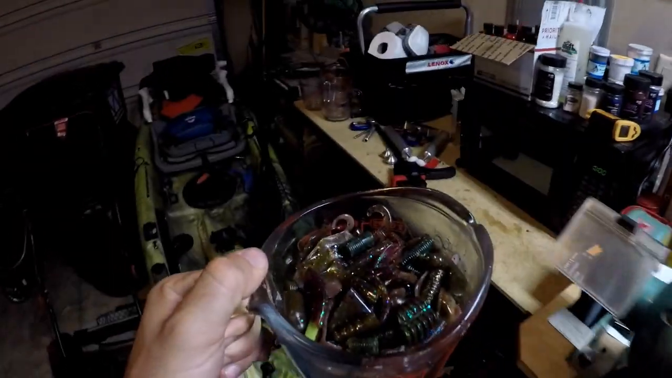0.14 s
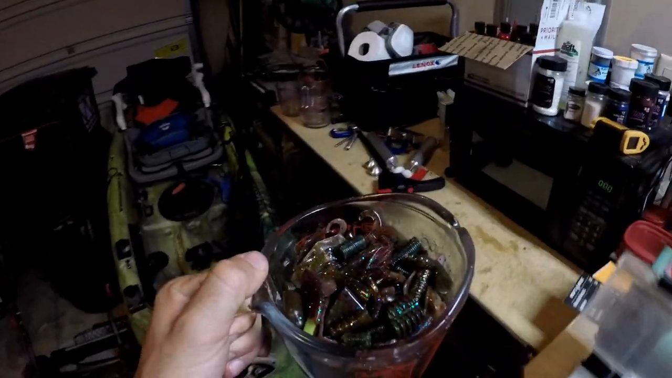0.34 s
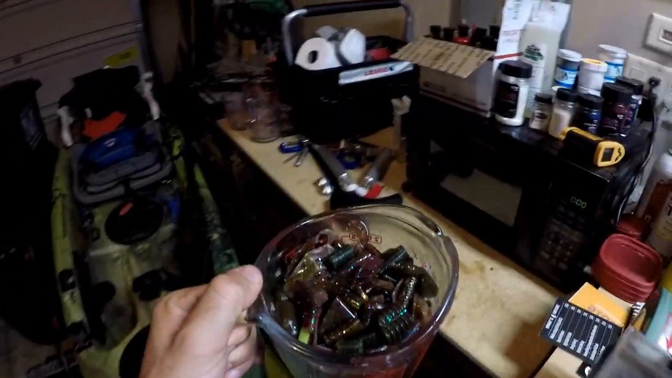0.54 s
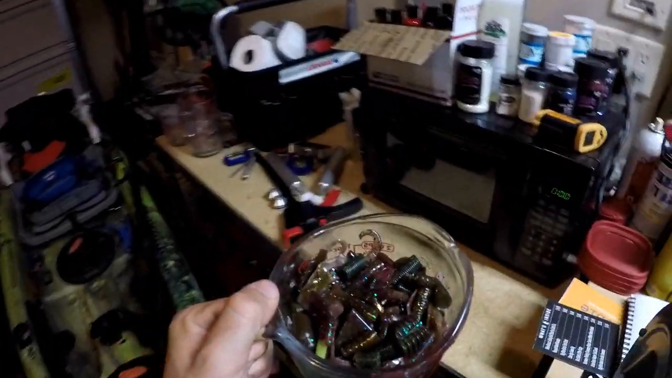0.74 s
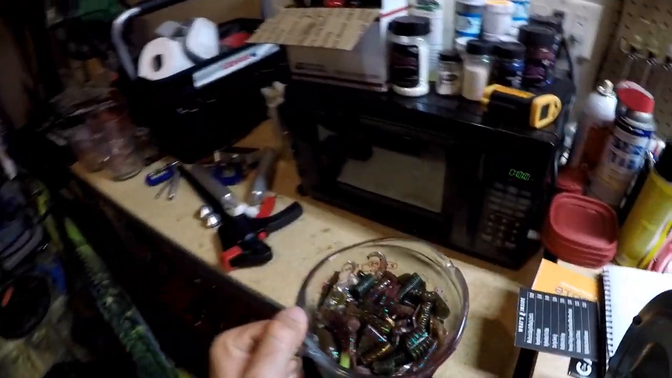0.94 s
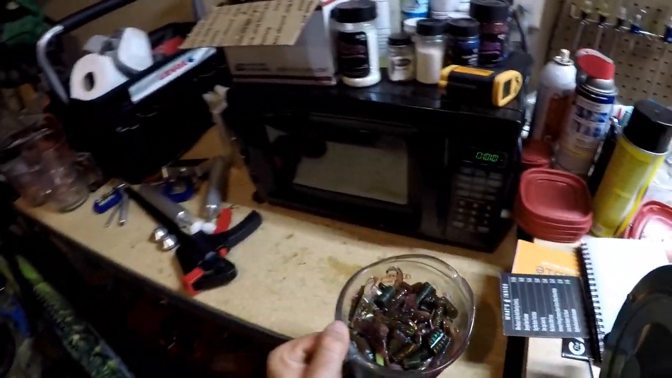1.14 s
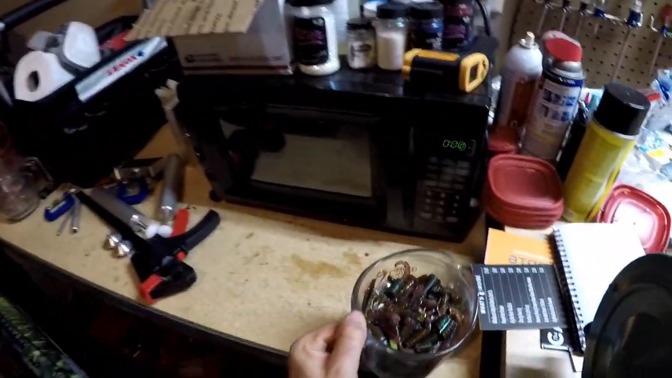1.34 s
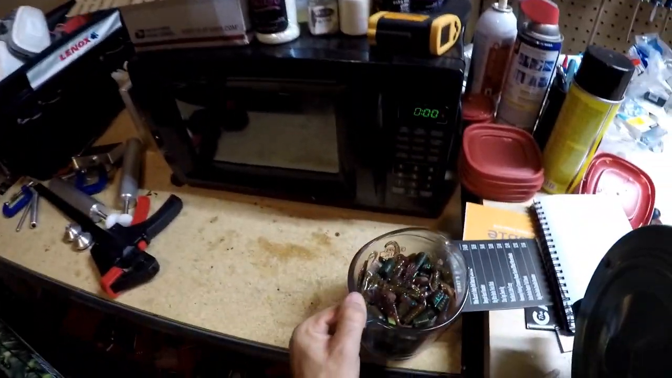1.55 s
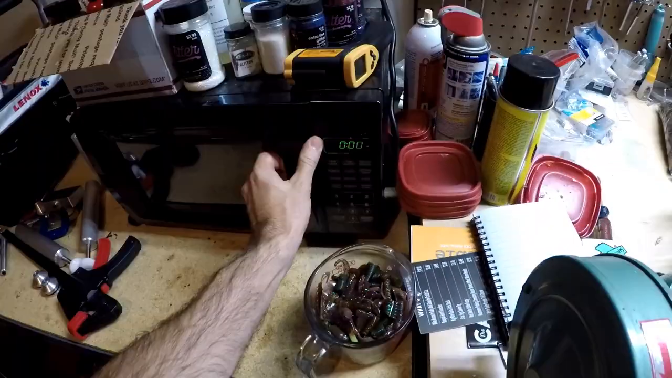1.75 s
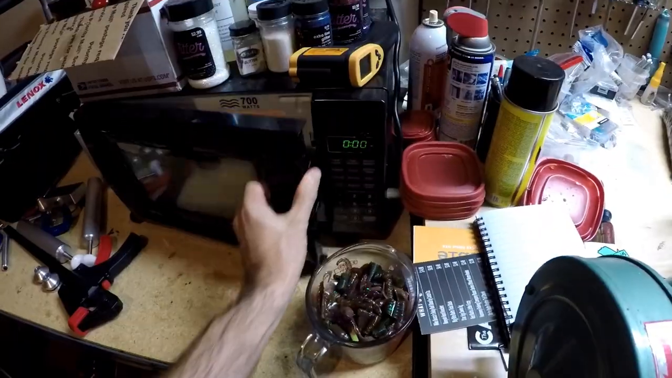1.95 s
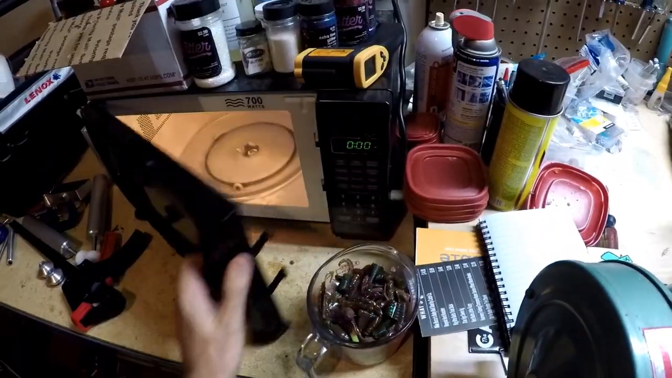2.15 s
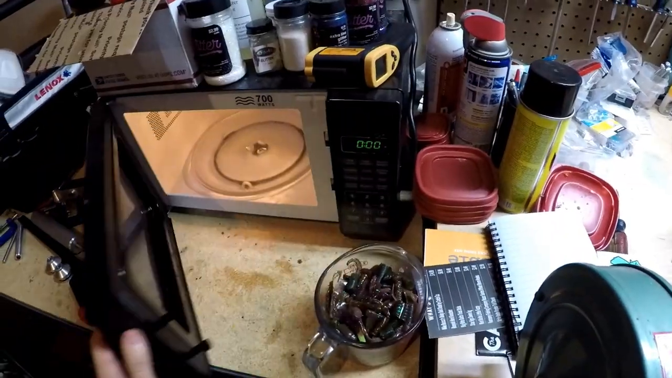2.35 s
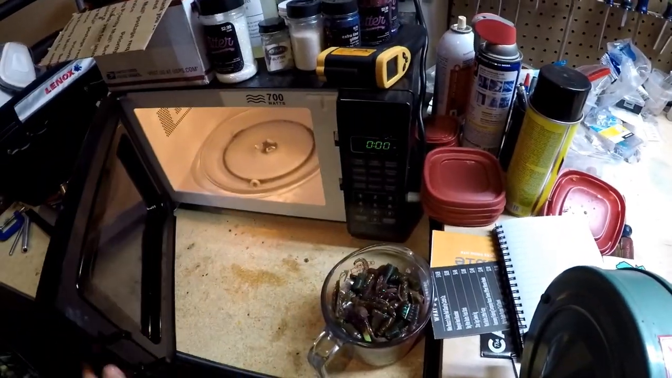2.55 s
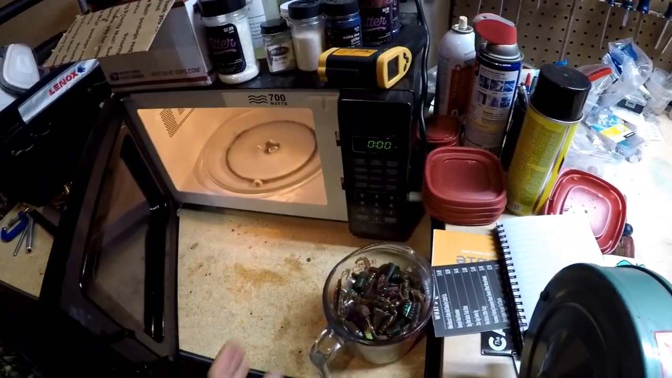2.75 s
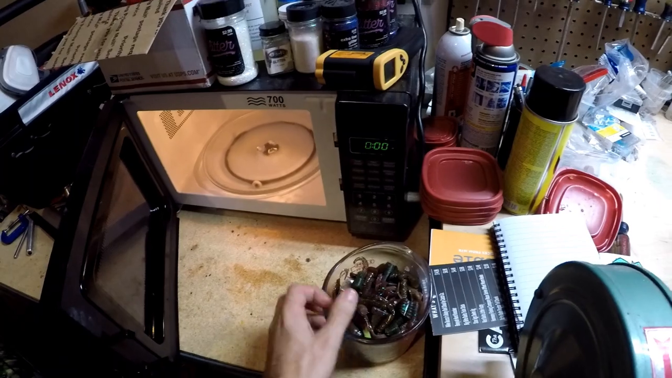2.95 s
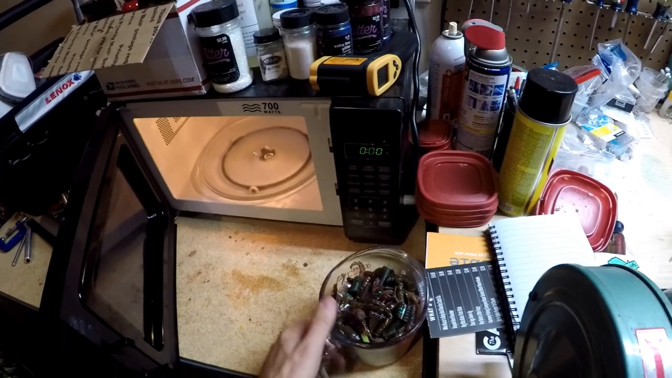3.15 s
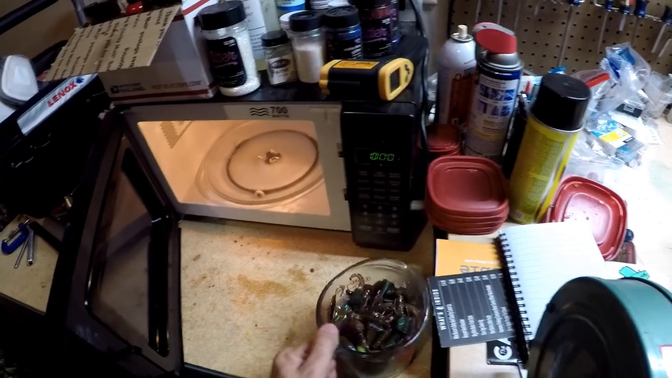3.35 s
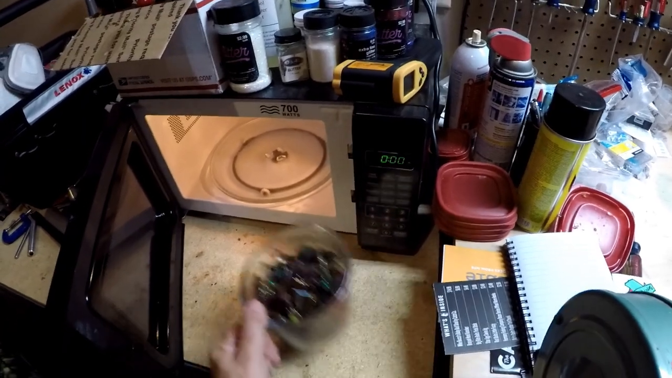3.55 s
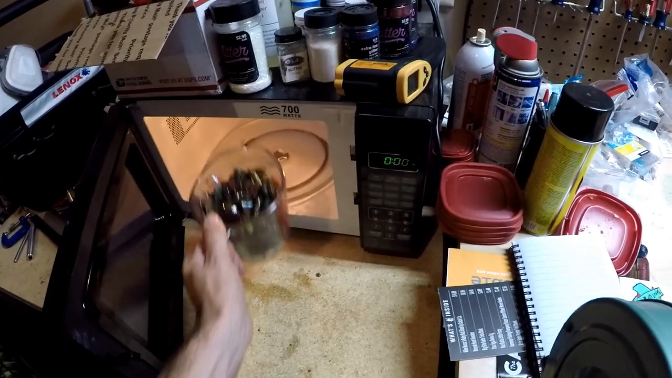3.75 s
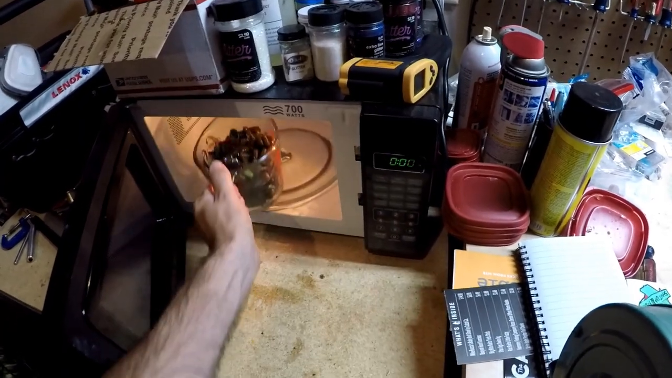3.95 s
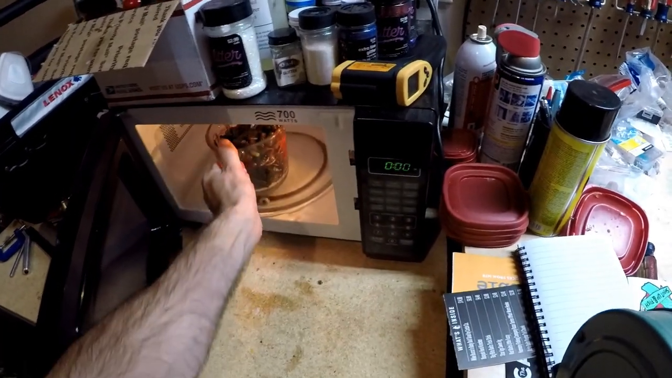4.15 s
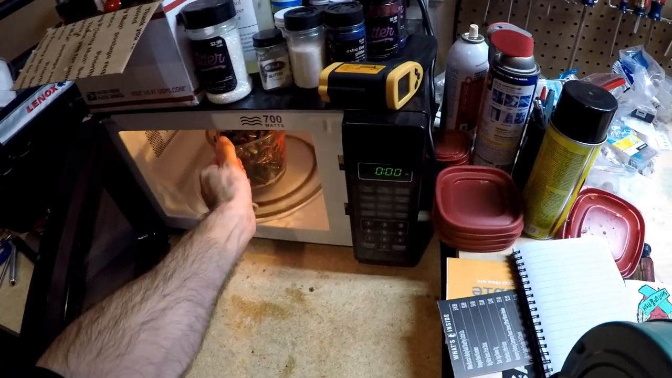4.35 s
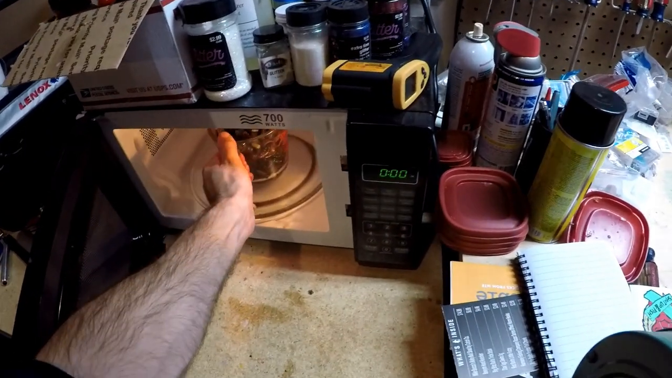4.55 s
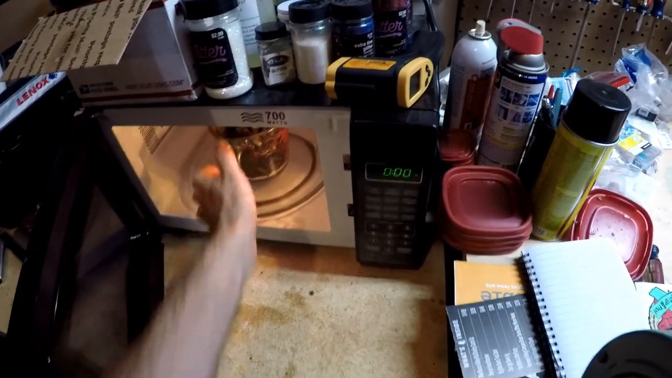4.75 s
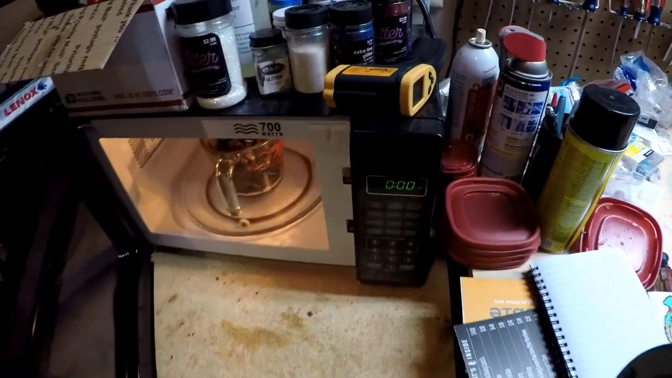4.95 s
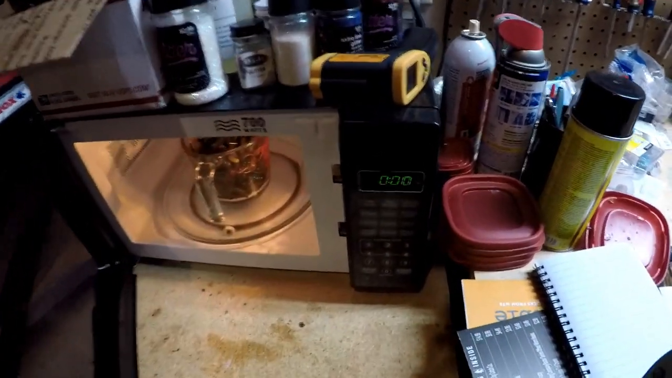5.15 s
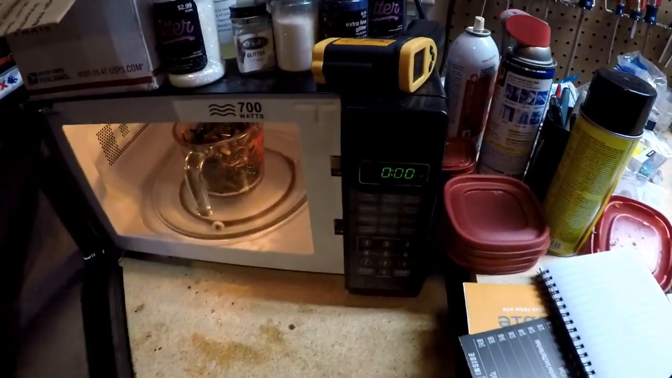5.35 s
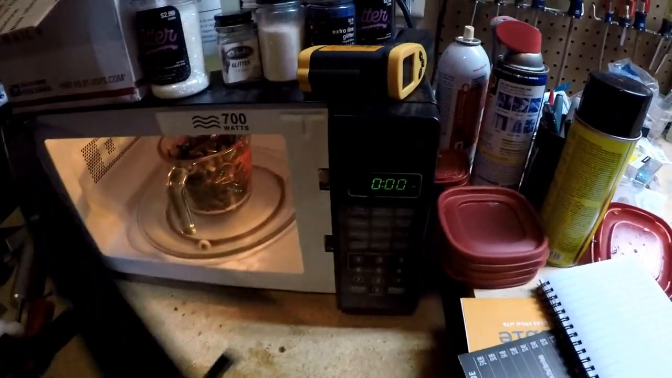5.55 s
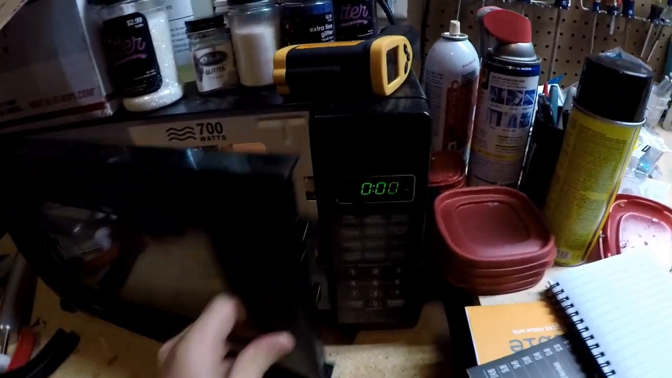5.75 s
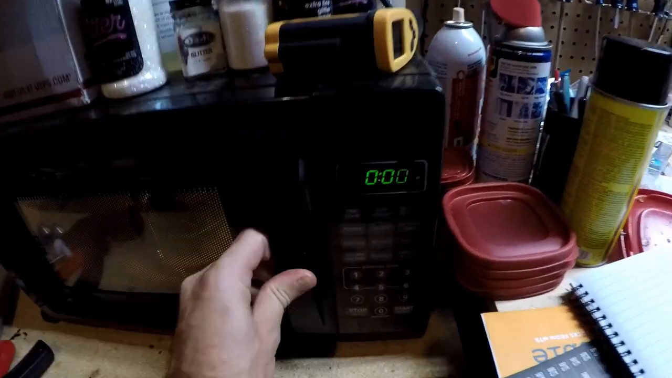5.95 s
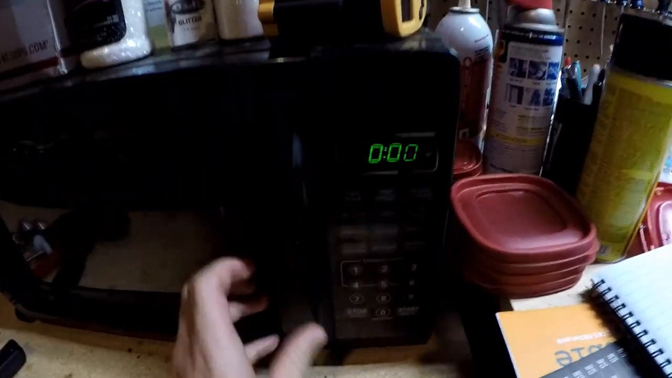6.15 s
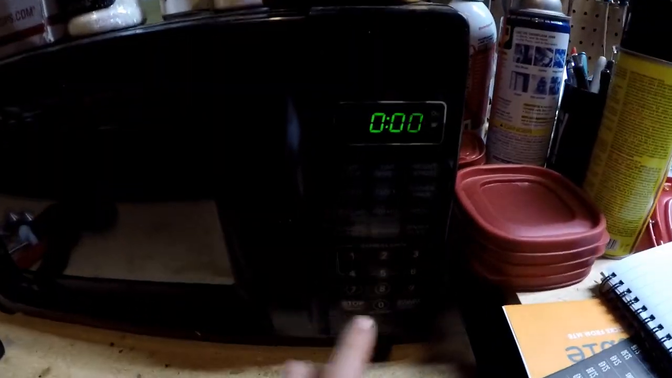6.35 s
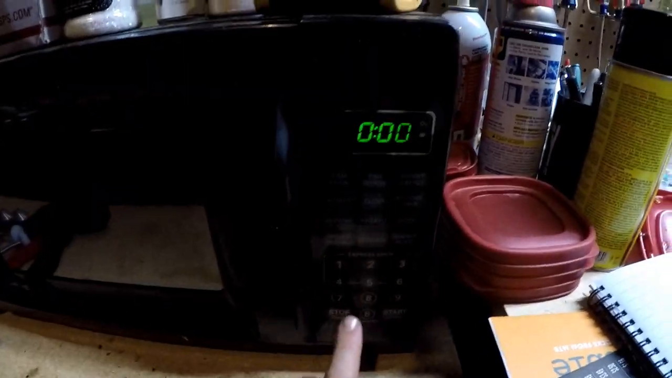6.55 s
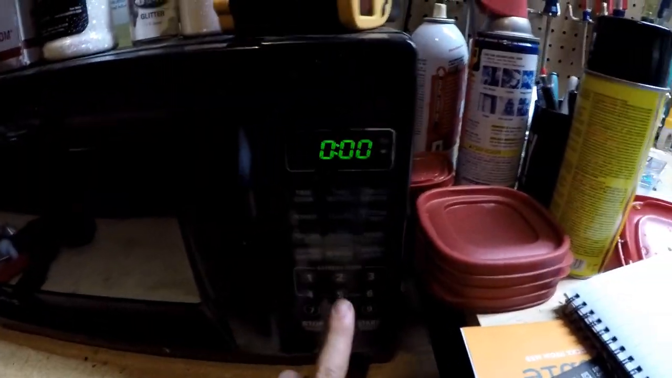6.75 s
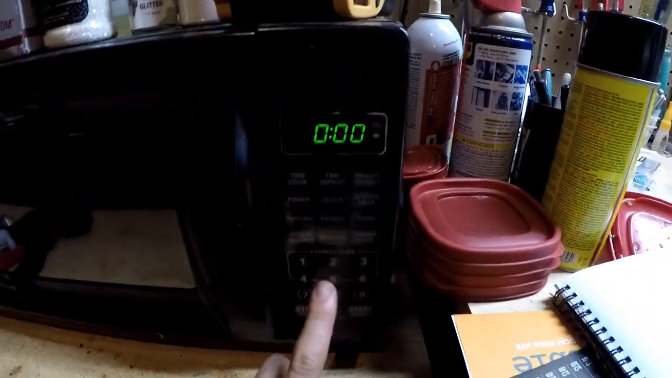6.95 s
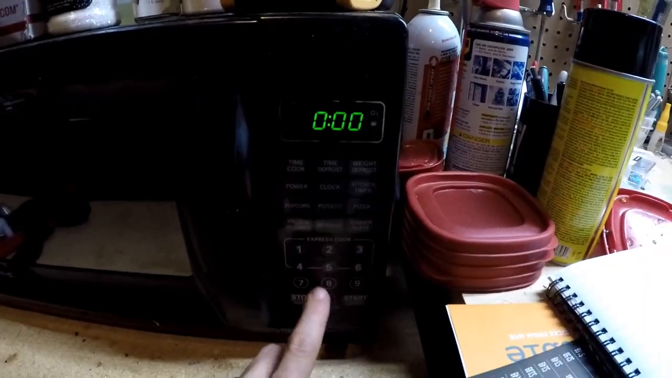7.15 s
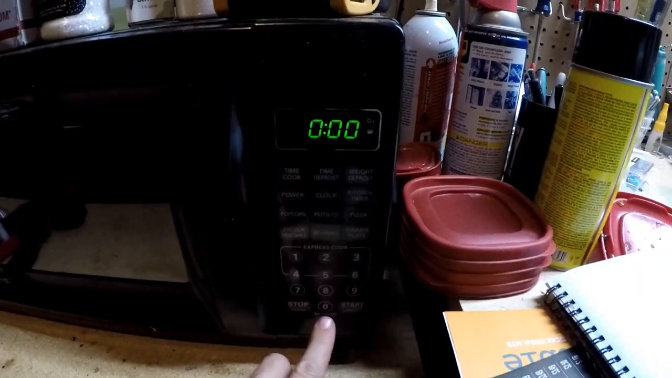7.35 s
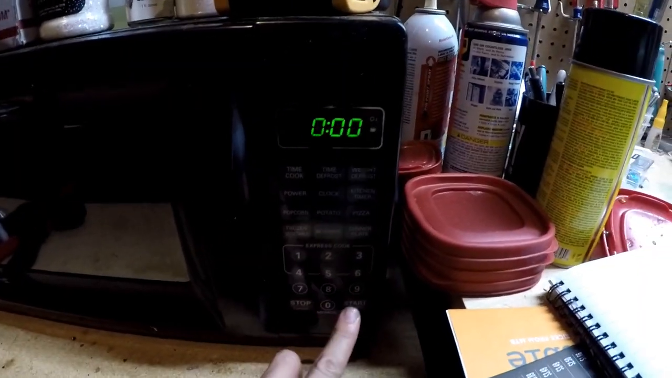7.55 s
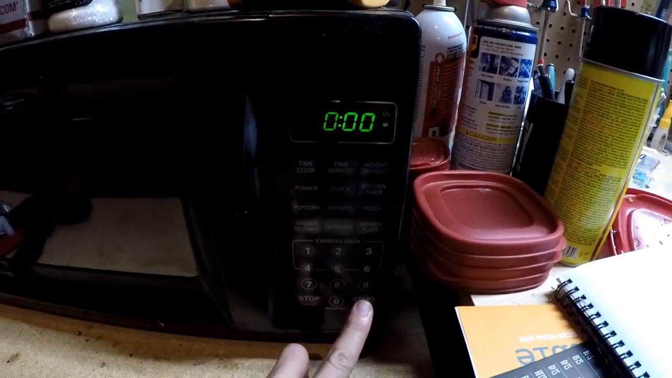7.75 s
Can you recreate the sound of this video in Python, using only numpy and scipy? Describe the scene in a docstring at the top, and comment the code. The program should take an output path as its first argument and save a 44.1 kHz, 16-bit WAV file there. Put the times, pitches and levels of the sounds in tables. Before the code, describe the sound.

Faint hiss and the low rumble of a moving body-worn microphone run throughout, with soft shoe scuffs in the first second. At about 1.5 seconds a glass measuring cup knocks down on a workbench. A microwave door clunks open at 1.8 seconds, its latch spring humming faintly, and the hinge clicks lightly until 2.5. Around 3.2 seconds the cup judders softly as it is dragged off the bench. At 4.3 it clinks sharply on the glass plate inside, rings, lands and rocks quickly to rest while small metal parts jingle lightly. After a few soft bumps, the door bangs shut at about 5.8 seconds, the loudest sound, and the spring hums on, fading slowly. Low thumps follow, and a hand squeaks faintly off the door around 6.4 seconds. The knocks echo briefly in the workshop, and only rumble and hiss remain near 8 seconds.

```python
"""In a cluttered workshop, over a faint hiss, a body-worn camera rumbles as it moves and shoes scuff the floor.
A glass measuring cup full of small parts knocks down on a bench. A microwave door is pulled open and
its latch spring hums. The cup is dragged off the bench and set on the glass plate inside, where it
rings and rocks while the parts jingle. The door is pushed shut, the spring rings on, and a hand
squeaks as it leaves the door. The knocks echo briefly in the room."""
import sys
import numpy as np
from scipy import signal
from scipy.fft import rfft, irfft, next_fast_len
from scipy.io import wavfile
from scipy.ndimage import uniform_filter1d

SR = 44100
rng = np.random.default_rng(int(sys.argv[2]) if len(sys.argv) > 2 else 0)


def wav_out(sig):
    """Save sig, one row per channel (or a flat mono array), as 16-bit PCM at SR to the path in sys.argv[1]."""
    wavfile.write(sys.argv[1], SR, np.round(np.clip(np.atleast_2d(sig).T, -1, 1) * 32767).astype(np.int16))


N = 348257

# A "fade" is the time a sound takes to drop by 60 dB. A higher "tilt" makes it brighter.
# Tone colours, or how strong each pitch is within a sound: f/Hz, level/dB
HISS_COLOUR = [(100, -10), (300, -17.5), (700, -16), (2000, -22.5), (5000, -29.5), (14700, -36.5),
               (16000, -39)]
RUMBLE_COLOUR = [(12, 4), (30, -7), (54, -12), (109, -25), (179, -29), (300, -34), (900, -63)]
SCUFF_COLOUR = [(470, -37.5), (800, -13), (1320, -7.5), (1800, -12.5), (3570, 1.5), (4560, -8),
                (5420, -3.5), (7280, -15), (15000, -28.5)]
BENCH_COLOUR = [(40, -27.5), (70, -7.5), (209, -13), (372, -4), (577, -7), (727, -8), (1000, -9.5),
                (2780, -25.5), (5500, -38), (15000, -74)]
DOOR_COLOUR = [(35, -29), (60, -9.5), (167, -8.5), (320, -3), (486, -7), (1290, -9), (2100, -11.5),
               (2530, -12.5), (3600, -17), (4250, -28), (5200, -24), (5980, -36.5), (8670, -33.5),
               (15500, -49)]
HINGE_COLOUR = [(150, -24), (1500, -6), (5400, -29), (14000, -70)]
PLATE_COLOUR = [(35, -37), (60, -11), (200, -16), (359, -15), (509, -6), (721, -9), (889, -0.3),
                (2360, -14), (3150, -4.5), (4200, -29), (5200, -27), (7000, -50), (15500, -68)]
# How loud the camera mount rumbles: t/s, level/dB
RUMBLE_LEVELS = [(0, -43), (.55, -39), (1.15, -40), (1.6, -50), (2.2, -52), (3.1, -45), (3.6, -47),
                 (4.25, -48), (4.6, -43), (5.3, -39), (5.8, -38), (6.3, -41.5), (6.8, -42), (7.25, -47),
                 (7.9, -40)]
# Rubs of shoes, cup and hand, and the hand's squeaks: t/s, level/dB, rise/s, hold/s
SCUFFS = [(.213, -56.5, .018, .05), (.275, -52.5, .035, .0), (.672, -57, .012, .04), (.9, -68, .03, .05),
          (1.08, -71, .02, .35), (3.2, -64, .03, .07), (6.342, -67, .01, .17), (6.57, -62, .006, .08)]
SQUEAKS = [(6.345, -56, .04, .008), (6.435, -60, .03, .065), (6.55, -61, .015, .04)]
# Single knocks: t/s, level/dB, tilt/(dB per octave), rattle fade/s
BENCH_KNOCKS = [(1.52, -4.5, -1.8, .025), (1.549, -17.5, -1.5, 0.08), (1.581, -25, -4, 0.056),
                (2.84, -44.5, -15.5, 0.15), (3.207, -50, 5, 0.05)]
DOOR_KNOCKS = [(1.689, -52, 6, .04), (1.726, -27, 3.5, 0.17), (1.759, -9.5, 2.3, 0.075),
               (2.572, -52, 8, 0.054), (5.204, -37, -4.5, 0.15), (5.799, -15.5, 0.4, 0.16),
               (5.822, -16, -3.5, .09), (5.855, -9.5, 0.9, .08), (5.863, -0.7, 0.9, 0.045),
               (5.885, -22.5, -2.5, 0.62), (5.999, -22, -9, 0.036), (6.072, -38, 2.5, 0.054),
               (6.201, -27, -16, 0.04), (6.383, -38, 1.5, 0.063), (6.572, -38, -2, 0.07)]
HINGE_KNOCKS = [(2.171, -46, 0.3, .07), (2.194, -41.5, 0.3, .1), (2.411, -33.5, -1.5, .13),
                (2.446, -32, -4, .13)]
PLATE_KNOCKS = [(4.31, -5.5, 1.2, 0.07), (4.314, -6, 2.4, 0.04)]
LANDING_KNOCKS = [(4.475, -21, 0.5, 0.051), (4.481, -8, -2.2, 0.04), (4.549, -29, -15, .06)]
# Quick runs of knocks: the four columns above for the first knock, then
# first gap/s, gap multiplier, level step/dB, tilt step/(dB per octave)
DOOR_BOUNCES = (1.784, -17.5, 0.1, .12, .0255, 1.0, -6, -0.1)
CUP_JUDDERS = (3.23, -40, 3.5, .2, .0315, 1.0, 2.5, -2.5)
CUP_ROCKS = (4.492, -13, -0.6, .06, .019, .9, -3, -1.2)
# The tones each thing rings with: f/Hz, level/dB, fade/s
BENCH_TONES = [(76.5, -12, .12), (144, -11.5, 0.1), (373.3, 3, 0.044), (690, -5, 0.063)]
DOOR_TONES = [(109, -10, .15), (159.66, 2.5, 0.18), (172, -1, 0.17), (194.6, -8, 0.5), (367, -8.5, 0.13),
              (587, -4.5, 0.1)]
SPRING_TONES = [(342.4, 0.5, 3.8), (681, -10.5, 2), (1017, -9, 1.2)]
HINGE_TONES = [(510, -4, .04), (1100, 0.5, .03)]
PLATE_TONES = [(517, -13, .25), (850, 3, .09), (1045, -4, .05), (3070, -5, .05)]
PART_TONES = [(7050, 5, .035), (9300, -6, .04), (11170, -8, .06), (11950, -8, .05)]
CUP_TONES = [(1651, -15.5, 0.52), (3120, -24.5, 0.26), (3430, -41, 0.77), (3693, -33.5, .37),
             (4721, -36.5, .4), (4750, -40, .4)]
LOADED_PLATE_TONES = [(479, -8, .26), (554, -5, .18), (930, 5, .055), (1066, 0.3, .15)]  # with the cup standing on it
# How long the room echoes: f/Hz, fade/s
ROOM_FADES = [(100, 0.97), (500, 0.53), (2000, 0.55), (6000, 0.62), (14000, 0.21)]
# Thumps of the camera mount and door panel: t/s, level/dB, f/Hz
THUMPS = [(1.734, -25.5, 131), (1.786, -9, 172), (1.825, -18, 165), (2.49, -35, 166), (2.837, -34.5, 90),
          (3.233, -28, 130), (4.662, -24.5, 85), (4.942, -27, 52), (5.202, -28, 92), (5.265, -38, 170),
          (5.35, -28, 68), (5.444, -29, 92), (5.816, -9.5, 153), (6.204, -16, 77), (6.224, -18.5, 122),
          (6.328, -27.5, 104.1)]
# The latch lets its spring go: t/s, level/dB
SPRING_PLUCKS = [(1.91, -51), (5.952, -44)]
# Faint pings, mostly of metal, the 1226 Hz one from the glass plate: t/s, level/dB, f/Hz, fade/s
PINGS = [(2.159, -53, 2480, .08), (3.053, -60.5, 1372, .4), (3.208, -54, 4900, .025),
         (3.261, -52, 3200, .08), (3.262, -57, 5150, .06), (4.491, -47.5, 1226, 1.2),
         (5.285, -60, 3470, .12)]
# The cup is jolted as it touches the plate and as it lands: t/s, level/dB
CUP_JOLTS = [(4.31, -48), (4.478, -51)]


def undb(db):
    """Turn decibels into a number to multiply a sound by."""
    return 10 ** (np.asarray(db, float) / 20)


def on_log_axis(table, size):
    """Read a table of (f/Hz, value) at each frequency in the spectrum of `size` samples."""
    hz, value = np.transpose(table)
    bin_hz = np.maximum(np.arange(size // 2 + 1), 1) * SR / size
    return np.interp(np.log(bin_hz), np.log(hz), value)


def tone_filter(db):
    """A filter with these levels that never sounds before it is hit (minimum phase)."""
    cepstrum = irfft(db * np.log(10) / 20)
    half = len(cepstrum) // 2
    cepstrum[1:half] *= 2
    cepstrum[half + 1:] = 0
    return np.exp(rfft(cepstrum))


def ring(tones, size):
    """A ringing object: pure tones that each fade away."""
    t = np.arange(size) / SR
    return sum(undb(db - 60 * t / fade) * np.sin(2 * np.pi * hz * t) for hz, db, fade in tones)


def add(out, start, sound):
    """Mix a sound in at `start` seconds."""
    i = int(start * SR)
    out[i:i + len(sound)] += sound[:N - i]


def noise(colour):
    """Steady noise of strength 1 in the given tone colour."""
    size = next_fast_len(N + N % 2, True)
    x = irfft(rfft(rng.standard_normal(size)) * undb(on_log_axis(colour, size)), size)[:N]
    return x / x.std()


def wobble(per_second):
    """A smooth line that wanders between random values."""
    hold = int(SR / per_second)
    steps = np.repeat(rng.standard_normal(N // hold + 1), hold)
    return uniform_filter1d(uniform_filter1d(steps, hold), hold)[:N]


def swells(rows, fade_db_per_s):
    """Loudness over time: each row rises, holds and dies away."""
    t = np.arange(N) / SR
    out = np.zeros(N)
    for start, db, rise, hold in rows:
        fading_s = np.maximum(t - start - rise - hold, 0)
        out += np.clip((t - start) / rise, 0, 1) ** 2 * undb(db - fade_db_per_s * fading_s)
    return out


def repeats(run, count=3):
    """List the knocks of a run, stepping the level and tilt each time."""
    start, db, tilt, fade, gap, growth, step_db, step_tilt = run
    times = [start + gap * np.sum(growth ** np.arange(k)) for k in range(count)]
    return [(s, db + k * step_db, tilt + k * step_tilt, fade) for k, s in enumerate(times)]


def hiss(level_db=-67):
    """A faint background hiss that wavers a little."""
    return undb(level_db + 0.46 * wobble(3)) * noise(HISS_COLOUR)


def camera_rumble():
    """The moving camera shakes its mount, making a low, lumpy noise."""
    return noise(RUMBLE_COLOUR) * curve_gain(RUMBLE_LEVELS) * undb(0.83 * wobble(24))


def curve_gain(table):
    """Loudness that glides from one (t/s, level/dB) row to the next."""
    times, db = np.transpose(table)
    return undb(np.interp(np.arange(N) / SR, times, db, -120, -120))


def scuffs():
    """Gritty rubbing: shoes on the floor, the cup on the bench, a hand on the door."""
    return noise(SCUFF_COLOUR) * undb(2.0 * wobble(130)) * swells(SCUFFS, fade_db_per_s=140)


def knocks(rows, tones, colour, ring_db, grit_db, size=1 << 15):
    """Each knock rings an object and rattles loose parts. Gives two tracks: direct, and for the echo."""
    direct, to_room = np.zeros((2, N))
    t = np.arange(size) / SR
    octaves = on_log_axis([(500, -1), (16000, 4)], size)  # counted from 1000 Hz
    colour_db = on_log_axis(colour, size)
    ringing = rfft(ring(tones, size))
    ringing /= np.abs(ringing).max()
    crack = undb(2.5 - 60 * t / 0.0088)  # the first hard contact stands out of the rattle
    rise = 1 - np.exp(-t / 0.0026)
    for start, db, tilt, fade in rows:
        grit = undb(grit_db * np.repeat(rng.standard_normal(size // 64), 64))
        rattle = rfft(rng.standard_normal(size) * grit * (undb(-60 * t / fade) + crack) * rise)
        tap = np.sqrt(np.mean(np.abs(rattle) ** 2))  # one clean tap with the rattle's energy
        tilt_db = tilt * octaves  # a softer contact is duller
        body = tone_filter(colour_db + tilt_db)
        tilted_ring = ringing * tone_filter(tilt_db)
        sound = irfft(rattle * body + undb(ring_db) * (tap + 0.22 * rattle) * tilted_ring)
        gain = undb(db) / np.sqrt(np.mean(sound[:SR // 100] ** 2)) / 2  # set by the first 10 ms
        add(direct, start, gain * sound)
        add(to_room, start, gain * tap * irfft(body + tilted_ring))
    return np.array([direct, to_room])


def cup_on_bench():
    """The cup knocks the bench, and later judders as it is dragged off."""
    return knocks(BENCH_KNOCKS + repeats(CUP_JUDDERS), BENCH_TONES, BENCH_COLOUR, ring_db=2, grit_db=4.5)


def room_echo(sound, level_db=-14):
    """Many reflections blur into one tail; the deepest notes last longest."""
    t = np.arange(SR) / SR
    table_hz, fades = np.transpose(ROOM_FADES)
    tail = np.zeros(SR)
    for hz in 60 * 2 ** np.arange(0, 8.1, .5):  # bands half an octave wide
        fade = np.interp(np.log(hz), np.log(table_hz), fades)
        band = signal.butter(2, [hz / 2 ** .25, hz * 2 ** .25], "bandpass", fs=SR, output="sos")
        tail += signal.sosfilt(band, rng.standard_normal(SR)) * undb(-60 * t / fade)
    tail *= 1 - np.exp(-t / 0.002)
    return undb(level_db) * signal.fftconvolve(sound, tail / np.sqrt(np.sum(tail ** 2)))[:N]


def door():
    """The door clunks open with a few bounces, and later bangs shut."""
    return knocks(DOOR_KNOCKS + repeats(DOOR_BOUNCES), DOOR_TONES, DOOR_COLOUR, ring_db=2.5, grit_db=2.5)


def thumps():
    """Each bump of the camera mount or door panel is one short, low tone."""
    out, t = np.zeros(N), np.arange(SR // 4) / SR
    for start, db, hz in THUMPS:
        add(out, start, ring([(hz, db, .09)], len(t)) * (1 - np.exp(-t / 0.0034)))
    return out


def latch_spring(steadied_s=2.2, drop_db=-3):
    """The spring hums after each release; the swinging door quietens the first hum a little."""
    out, t = np.zeros(N), np.arange(3 * SR) / SR
    hum = (1 - np.exp(-t / 0.01)) * ring(SPRING_TONES, len(t))
    for start, db in SPRING_PLUCKS:
        steadied = np.clip((start + t - steadied_s) / 0.028, 0, 1) * (start < steadied_s)
        add(out, start, undb(db + drop_db * steadied) * hum)
    return out


def pings():
    """Faint pings, each ringing once with a single tone: mostly small metal parts, and at 4.491 s the glass
    plate."""
    out = np.zeros(N)
    for start, db, hz, fade in PINGS:
        add(out, start, ring([(hz, db, fade)], SR))
    return out


def hinge():
    """The hinge clicks as the door swings open."""
    return knocks(HINGE_KNOCKS, HINGE_TONES, HINGE_COLOUR, ring_db=3, grit_db=3)


def cup_touches_plate():
    """Glass meets glass, and the plate clinks."""
    return knocks(PLATE_KNOCKS, PLATE_TONES, PLATE_COLOUR, ring_db=7, grit_db=1.5)


def jingling_parts(hits=160, jostle_s=.17, settle_s=.012):
    """After each jolt, metal parts in the cup collide at random, each hit ringing one high tone."""
    out = np.zeros(N)
    for start, db in CUP_JOLTS:
        for when, which, softness, detune in rng.random((hits, 4)):
            hz, tone_db, fade = PART_TONES[int(which * len(PART_TONES))]
            hz *= 1 + .045 * (detune - .5)  # the parts are alike, but not quite the same
            delay = when * jostle_s
            settled_db = 18 * np.log10(1 + delay / settle_s)  # quickly at first, then more slowly
            hit_db = db + tone_db - settled_db - 8 * softness
            add(out, start + delay, ring([(hz, hit_db, fade)], SR // 8))
    return out


def cup_ring(touch_s=4.311, lands_s=4.455, muffle_db=-25):
    """The glass rings freely from its first touch until its base settles and muffles it."""
    out, t = np.zeros(N), touch_s + np.arange(SR) / SR
    muffled = np.clip((t - lands_s) / 0.0172 + .5, 0, 1)
    add(out, touch_s, ring(CUP_TONES, SR) * undb(muffle_db * muffled))
    return out


def cup_lands():
    """The cup lands flat on the plate and rocks to rest."""
    rows = LANDING_KNOCKS + repeats(CUP_ROCKS)
    return knocks(rows, LOADED_PLATE_TONES, PLATE_COLOUR, ring_db=9, grit_db=2.5)


def hand_squeaks(pitch_hz=1760, width_hz=300):
    """A hand slips off the door with rough squeaks, made from a narrow band of noise."""
    edges = [pitch_hz - width_hz / 2, pitch_hz + width_hz / 2]
    band = signal.butter(2, edges, "bandpass", fs=SR, output="sos")
    squeak = signal.sosfilt(band, rng.standard_normal(N))
    return squeak / squeak.std() * undb(3.0 * wobble(90)) * swells(SQUEAKS, fade_db_per_s=400)


def scene():
    """Mix everything into one channel; only the knocks get an echo."""
    direct, to_room = cup_on_bench() + door() + hinge() + cup_touches_plate() + cup_lands()
    noises = hiss() + camera_rumble() + scuffs() + hand_squeaks()
    rings = thumps() + latch_spring() + pings() + jingling_parts() + cup_ring()
    return (noises + direct + room_echo(to_room) + rings)[None]


def record(dry):
    """The recorder rounds off the loudest peaks and cuts the treble above 15500 Hz."""
    rounded = np.tanh(.75 * dry) / .75
    treble_cut = signal.ellip(8, .2, 70, 15500, fs=SR, output="sos")
    return signal.sosfilt(treble_cut, rounded).clip(-.98, .98)


dry = scene()
out = record(dry)
wav_out(out)
```